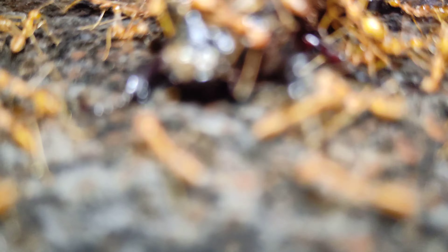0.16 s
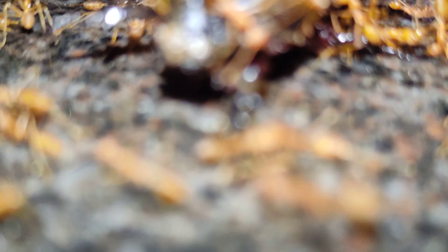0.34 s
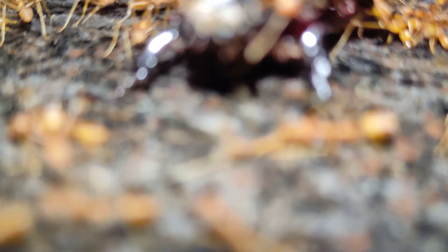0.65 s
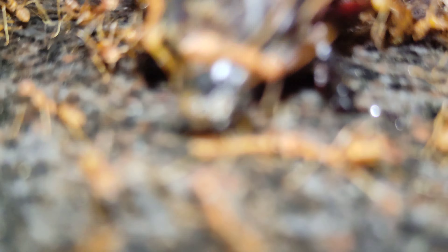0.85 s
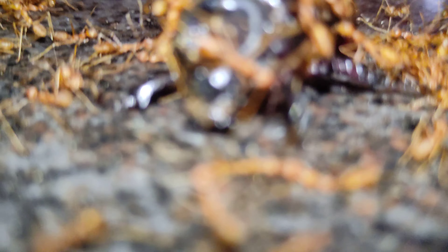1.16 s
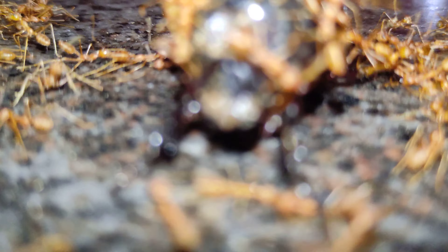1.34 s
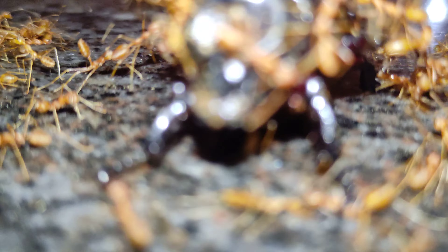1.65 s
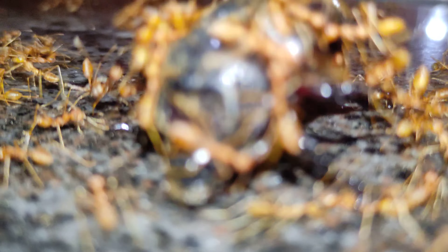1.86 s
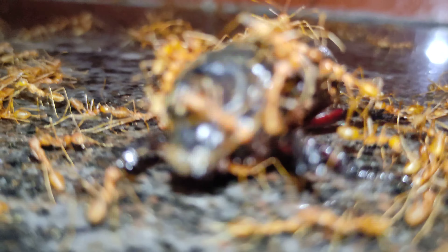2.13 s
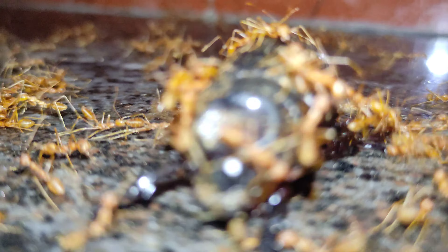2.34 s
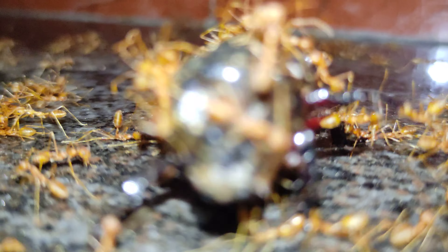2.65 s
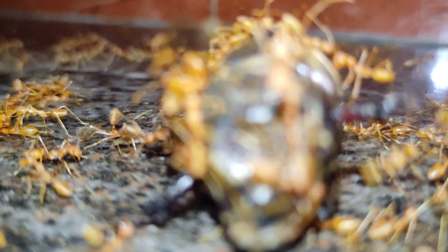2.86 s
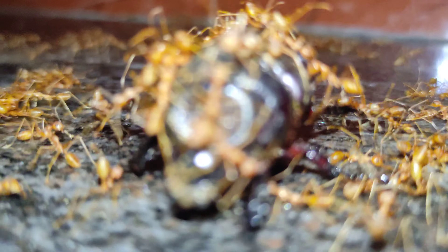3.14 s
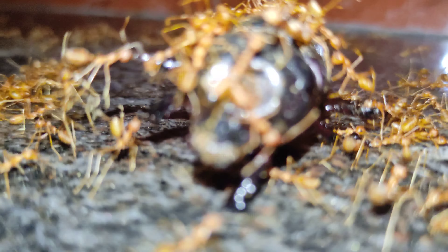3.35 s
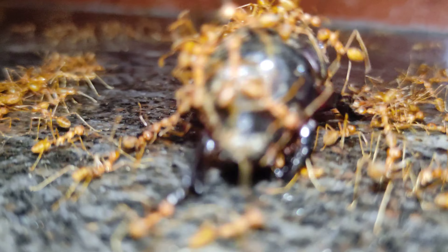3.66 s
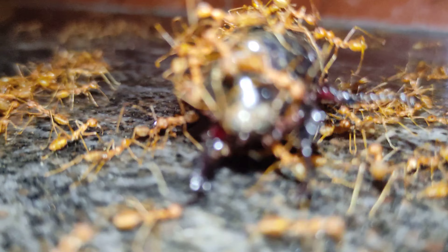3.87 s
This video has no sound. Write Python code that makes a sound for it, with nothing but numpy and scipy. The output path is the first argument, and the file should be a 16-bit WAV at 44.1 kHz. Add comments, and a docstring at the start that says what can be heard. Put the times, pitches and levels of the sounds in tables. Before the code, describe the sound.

Faint close ticks and light rubbing come first, then a quiet stretch, then harsh bright scratching with sharp snaps on the right, easing off at the end; crickets and high trills continue around outdoors.

```python
"""A low distant hum and a steady chorus of night insects are heard first, outdoors.
Two trillers, one far and one near, and crickets with an echo sing over them: pulsed resonances and tone bursts.
Something ticks and scrapes right at the right microphone port, loudest near the end: struck modes and
noise shaped by random slips. The scraping leaks faintly to the left port."""
import sys
import numpy as np
from scipy import signal
from scipy.fft import rfft, irfft
from scipy.io import wavfile
from scipy.ndimage import uniform_filter1d

SR = 44100
rng = np.random.default_rng(int(sys.argv[2]) if len(sys.argv) > 2 else 0)


def int16_out(signal):
    """Quantize to a 16-bit WAV file."""
    q = np.round(np.clip(np.atleast_2d(signal).T, -1, 1) * 32767)
    wavfile.write(sys.argv[1], SR, q.astype(np.int16))


def gain_from_db(level_db):
    """Convert decibel levels to linear amplitude factors (20 dB per decade)."""
    decades = np.asarray(level_db, float) / 20
    return 10 ** decades


N = 176400  # samples


def evened(x):
    """Normalization: scales a signal to rms 1."""
    return x / np.sqrt(np.mean(x ** 2) + 1e-20)


def read(points, hz):
    """Interpolation of a table along a logarithmic frequency axis."""
    f, value = np.transpose(points)
    return np.interp(np.log(hz + 1), np.log(f + 1), value)


def colour(x, points):
    """Linear filtering: multiplies the spectrum by a gain table in dB."""
    gain = gain_from_db(read(points, np.fft.rfftfreq(N, 1 / SR)))
    return irfft(rfft(x) * gain, N)


def resonate(x, hz, width):
    """Resonance: one damped pole applied three times about a centre hz, which may be a curve."""
    turn = np.exp(2j * np.pi * np.cumsum(hz * np.ones(N)) / SR)
    r = np.exp(-np.pi * width / SR)
    # shift the centre to 0 Hz, filter there, and shift back
    ringing = turn * signal.lfilter([1], np.poly([r, r, r]), x / turn)
    return evened(ringing.real)


def tail(t60, length):
    """Diffuse decay: two exponentially dying noise responses of energy 1."""
    t = np.arange(round(length * SR)) / SR
    h = rng.standard_normal((2, len(t))) * gain_from_db(-60 * t / t60)
    return h / np.linalg.norm(h, axis=1, keepdims=True)


# Relative spectral density of the background: f/Hz, level/dB
AIR_SPECTRUM = [(25, -45), (50, -34), (100, -5.5), (150, -3.5), (300, -6), (700, -14.5), (1200, -20.5),
                (2700, -28), (4500, -28), (5600, -32.5), (7500, -25), (9500, -26.5), (11000, -45.5),
                (14500, -34), (15300, -41), (15800, -86)]
# Correlation between the ports: f/Hz, left-right likeness (0 to 1)
AIR_LIKENESS = [(60, 0.91), (200, 0.66), (400, 0.72), (800, 0), (2000, 0)]
# Balance of the ports: f/Hz, left minus right level/dB
AIR_BALANCE = [(30, 9), (100, -2.5), (300, 1.5), (2000, 0), (7000, -7), (14000, 17)]


def air():
    """Partially coherent diffuse field: random spectra give distant hum and hiss in drifting patches."""
    frames, hz = N // 256 + 5, np.fft.rfftfreq(1024, 1 / SR)
    a, b, c, d, patches = rng.standard_normal((frames, 513, 5)).T
    patches = uniform_filter1d(patches, 10, 0)  # smooth along frequency
    patches = evened(uniform_filter1d(patches, 12, 1))  # and along time
    same = np.clip(read(AIR_LIKENESS, hz), -1, 1)[:, None]
    left = a + 1j * b
    right = same * left + np.sqrt(1 - same ** 2) * (c + 1j * d)
    side = read(AIR_BALANCE, hz)[:, None] / 2
    level_db = read(AIR_SPECTRUM, hz)[:, None] + 0.4 * patches
    z = np.array([left, right]) * gain_from_db(level_db + np.array([side, -side]))
    field = signal.istft(z, nperseg=1024, noverlap=768)[1][:, :N]
    return gain_from_db(-55) * evened(field)


# Steady insect bands: f/Hz, single-pass width/Hz, left level/dB, right level/dB (before the throb)
CHORUS_BANDS = [(6808, 590, -59.5, -58.5), (6300, 370, -78, -69), (4490, 760, -72, -76),
                (13320, 870, -85, -76.5), (11950, 220, -79.5, -79)]


def chorus():
    """Incoherent superposition: many far insects blur into narrow noise bands that throb a little."""
    out = np.zeros((2, N))
    for hz, width, left_db, right_db in CHORUS_BANDS:
        throb_db = 1.1 * evened(uniform_filter1d(rng.standard_normal(N), 1500))
        band = resonate(rng.standard_normal((2, N)), hz, width)
        out += band * gain_from_db(np.array([[left_db], [right_db]]) + throb_db)
    return out


# Trills: start t/s, length/s, right level/dB before the swell, singer (0 far, 1 near)
TRILL_EVENTS = [(0.04, 0.4, -58.5, 0), (0.562, 0.4, -45, 1), (1.303, 0.41, -57, 0), (1.572, .38, -44.5, 1),
                (2.08, 0.38, -58.5, 0), (2.579, .34, -44.5, 1), (3.557, 0.39, -46.5, 1)]
# Wing resonances, one list per singer: highest f/Hz, single-pass width/Hz, relative level/dB
WING_MODES = [
    [(8290, 93, -14), (8060, 920, -11.5)],
    [(8272, 280, 2), (8535, 180, -0.5), (7710, 230, -10)],
]
TRILL_PULSES_PER_S = 270  # on average
TRILL_RISE_S, TRILL_FALL_S = 0.12, 0.086  # onset length, e-folding time of the decay
TRILL_ARCH_HZ, TRILL_CLIMB_S = 219, 0.093  # initial pitch deficit, e-folding time of the climb


def trillers():
    """Forced resonance: uneven wing pulses ring modes; each trill climbs in pitch, holds, sags and dies away."""
    t, out, under_hz = np.arange(N) / SR, np.zeros((2, N)), np.zeros((2, N))
    uneven = 4.0 * uniform_filter1d(rng.standard_normal(N), 400)
    turns = np.cumsum(TRILL_PULSES_PER_S * (1 + uneven)) / SR
    pulses = 0.4 + np.exp(-(turns % 1) / 0.23)
    drive = pulses * rng.standard_normal((2, N))
    for start, length, _, singer in TRILL_EVENTS:
        u = t[t >= start] - start
        climb = np.exp(-u / TRILL_CLIMB_S)
        sag = 0.72 * np.minimum(u / length, 1.5) ** 3
        under_hz[round(singer), t >= start] = TRILL_ARCH_HZ * (climb + sag)
    voices = []
    for modes, under in zip(WING_MODES, under_hz):
        parts = [gain_from_db(db) * resonate(drive, hz - under, width) for hz, width, db in modes]
        voices.append(evened(sum(parts)))
    for start, length, level_db, singer in TRILL_EVENTS:
        rise = np.clip((t - start) / TRILL_RISE_S, 0, 1) ** 0.44
        fall = np.exp(-np.maximum(t - start - length, 0) / TRILL_FALL_S)
        swell_db = -4.0 * np.clip(2 * (t - start) / length - 1, -1, 1) ** 2
        out += gain_from_db(level_db + swell_db) * rise * fall * voices[round(singer)]
    return out * gain_from_db([[-8], [0]])  # the left port is weaker


# Chirp groups: start t/s, middle f/Hz, base level/dB, direct sound relative to the echo send/dB
CHIRP_GROUPS = [(.295, 3420, -62, -4), (.94, 3194, -63, -19), (1.458, 3418, -58.5, -7.5),
                (2.15, 3230, -64, -18), (2.588, 3434, -60.5, -4.5), (3.34, 3150, -65, -15),
                (3.83, 3440, -67.5, 5.5)]
# Successive chirps of a group: level relative to the base/dB
CHIRP_STEPS = [12, 11, -4]
CHIRP_S, CHIRP_GAP_S = 0.038, 0.087  # length, interval from start to start
CHIRP_SAG_HZ, CHIRP_BLUR_HZ = 30, 25.4  # fall over one chirp, rms pitch waver
YARD_T60_S, YARD_DB = 0.7, -6


def crickets():
    """Direct and reverberant field: groups of short sagging, unsteady tones with the yard's echo behind."""
    direct, sent, t = np.zeros(N), np.zeros(N), np.arange(N) / SR
    blur_hz = CHIRP_BLUR_HZ * evened(uniform_filter1d(rng.standard_normal(N), 300))
    waver = np.cumsum(blur_hz) / SR
    for start, hz, level_db, dry_db in CHIRP_GROUPS:
        for k, step_db in enumerate(CHIRP_STEPS):
            u = np.clip((t - start - k * CHIRP_GAP_S) / CHIRP_S, 0, 1)
            cycles = hz * t - CHIRP_SAG_HZ * CHIRP_S * (u ** 2 - u) / 2 + waver
            tone = gain_from_db(level_db + step_db) * np.sin(np.pi * u) * np.sin(2 * np.pi * cycles)
            direct += gain_from_db(dry_db) * tone
            sent += tone
    echo = signal.fftconvolve(sent[None], tail(YARD_T60_S, 1), axes=1)[:, :N]
    return direct * gain_from_db([[-1.5], [1.5]]) + gain_from_db(YARD_DB) * echo


CREEP_S, CREEP_DB = 0.001002, -77  # length and starting level of the rise before a blow


def ring(modes, chance):
    """Modal synthesis: one blow on modes, each a little different, after a short creep; peak 1."""
    t = np.arange(1500) / SR - CREEP_S
    x = np.zeros(len(t))
    for (hz, db, t60), a, b in zip(modes, chance[::2], chance[1::2]):
        envelope_db = np.where(t > 0, -60 * t / t60, -CREEP_DB * t / CREEP_S)
        mode_hz = hz * (1 + 0.16 * (b - 0.5))
        x += gain_from_db(db + 13.0 * (a - 0.5) + envelope_db) * np.sin(2 * np.pi * (mode_hz * t + a + b))
    return x / abs(x).max()


# Ticks: t/s, snap level/dB and knock level/dB before the gains, left minus right level/dB, knock f/Hz
TICK_EVENTS = [(0.599, -42, -55.5, -12, 506), (0.7507, -41, -51, -12, 382), (0.7619, -31, -36, -24, 406),
               (0.7673, -43, -42.5, -23, 404), (0.841, -46, -56, -6.5, 474), (0.9301, -39, -43, -8, 390),
               (0.9363, -24.5, -31.5, -6.5, 1510), (1.0337, -41, -49, 0.5, 406),
               (1.6414, -46, -71, -10, 643), (2.0301, -49, -56.5, -6, 579), (2.0462, -28, -52, -22, 423),
               (2.0719, -27.5, -55, -24, 425), (2.1176, -31, -59, -20, 382), (2.1226, -26.5, -70, -27, 382),
               (2.1734, -45, -58, -8, 450), (2.2104, -42, -55.5, -14, 450), (2.8546, -47, -61.5, -12, 540),
               (2.9309, -27, -71, -25, 390), (2.9612, -26, -65, -23, 1580), (3.0857, -21, -49, -32, 1210),
               (3.1198, -10.5, -33.5, -30, 1230), (3.1227, -7, -23, -25, 1260),
               (3.1367, -12, -43, -26, 1420), (3.1503, -5.5, -32, -42, 1110), (3.1593, -20, -50, -28, 1120),
               (3.1839, -9.5, -30, -31, 1150), (3.1917, -7.5, -30.5, -31, 1020),
               (3.1937, -10, -27, -26, 1320), (3.2244, -15, -43, -33, 1560), (3.3295, -9, -23, -34, 1380),
               (3.3324, -3.5, -26.5, -30, 1260), (3.3726, -17, -33.5, -34, 1280),
               (3.381, -18, -38, -37, 1570), (3.3978, -14, -39, -38, 1380),
               (3.4151, -13.5, -37.5, -32, 1420), (3.4421, -5, -24, -31, 1055),
               (3.7196, -48, -39.5, -15, 760), (3.8075, -18.5, -55, -24, 471)]
# Snap modes: nominal f/Hz, relative level/dB, t60/s
SNAP_MODES = [(3020, 0, 0.001), (4300, -6, 0.0057), (5400, 7.5, 0.0054), (6460, 11.5, 0.0024),
              (7900, 11, 0.0016), (9500, 7, .0025), (12040, 6, 0.0029), (14700, 0, 0.004)]
# Knock modes: ratio to the knock f, relative level/dB, t60/s
KNOCK_RATIOS = [(.35, -10.5, 0.014), (.6, -8, 0.0081), (1.0, 1.5, 0.0082), (1.5, -9.5, 0.0042),
                (2.4, -5.5, 0.0046)]
SNAP_GAIN_DB, KNOCK_GAIN_DB = 3.5, 12.5


def ticks():
    """Impulsive excitation: sharp snaps ring high modes, with a low knock of varying strength."""
    out = np.zeros((2, N + 1500))
    chances = rng.random((len(TICK_EVENTS), 16))
    for (s, snap_db, knock_db, left_db, knock_hz), chance in zip(TICK_EVENTS, chances):
        at = round(s * SR)
        knock_modes = [(ratio * knock_hz, db, t60) for ratio, db, t60 in KNOCK_RATIOS]
        snap = gain_from_db(SNAP_GAIN_DB + snap_db) * ring(SNAP_MODES, chance)
        knock = gain_from_db(KNOCK_GAIN_DB + knock_db) * ring(knock_modes, chance)
        out[:, at:at + 1500] += gain_from_db([[left_db], [0]]) * (snap + knock)
    return out[:, :N]


# Strokes, one list each: t/s, level/dB, low part relative/dB, treble part relative/dB (before part gains)
STROKES = [
    [(0.835, -67.5, 8, -10), (0.855, -57.5, 7, -5.8), (0.89, -56.5, 2.5, -9.5), (0.925, -54.5, 4, -3),
     (0.95, -55, 9, 2), (0.965, -69.5, 8, -14), (0.99, -56, 3.5, -6), (1.03, -55, 8.5, -9),
     (1.045, -61.5, 10, -4), (1.06, -66, 2, -3.8)],
    [(1.29, -73, 8, -5), (1.31, -58, -0.5, -12), (1.33, -61, -4, -14), (1.345, -64.5, 10, -16),
     (1.36, -64, 9, -15), (1.385, -66.2, 5.5, -10), (1.4, -74, 3.2, 1.7)],
    [(2.02, -78, -1, -4.7), (2.06, -79, 7, -11), (2.14, -71.5, 9, -8), (2.2, -68, 3, 1),
     (2.25, -75.5, 12, -12), (2.3, -73, 7, -12), (2.33, -86, 8, 1.0)],
    [(2.86, -74, 2.6, -14.0), (2.885, -48, -2.5, -14), (2.92, -43.5, -11, -10.5), (2.95, -42.5, -8, -15),
     (2.98, -42.5, -8, -12), (3.02, -43.0, -5, -11), (3.05, -37.5, -6.5, -7.9), (3.08, -34.5, -12, -7),
     (3.115, -30, -13, -6.5), (3.13, -46, -11, 0), (3.145, -36.5, -1, -11), (3.17, -40, -10, -4),
     (3.18, -37, -3, 1), (3.205, -35, -13.5, -3.5), (3.23, -33, -4.1, -3.1), (3.26, -30.5, -13.5, -7.5),
     (3.29, -27.5, -6, 1), (3.32, -26.5, -13, -8), (3.342, -36.5, 0.5, -4.0), (3.37, -32, -11.5, -3.5),
     (3.41, -34.5, -12, -0.6), (3.43, -40.5, -7, 6), (3.452, -47, 2.5, -13), (3.475, -49, -1.2, 5.5),
     (3.495, -57.5, 0.5, -3), (3.54, -55.5, 4.5, -2.5), (3.57, -45.5, -5.5, -7), (3.62, -52, -6, -5),
     (3.68, -50, -6.5, -8), (3.74, -57, 2, -5), (3.78, -50, -4.5, -11), (3.82, -61, 5, -2),
     (3.85, -49, 0.5, -6), (3.92, -50.5, -4, -2.5), (3.97, -49, -7, -3.5), (4.0, -55.5, 2.7, -6)],
]
# Colours of the rubbing, pressed hard or lightly: f/Hz, relative level/dB
BODY_HARD = [(1800, -18.5), (2800, -10), (3500, 0), (4500, 2.5), (5400, 7.5), (6600, 3), (7400, -2),
             (8600, -6), (9500, -50)]
BODY_LIGHT = [(1800, -24), (2700, -13), (3300, 2), (4200, 1), (4900, 0), (6600, -0.5), (7400, -5.5),
              (8600, -15.5), (9500, -36)]
LOW_HARD = [(150, -17), (600, -15.5), (1000, -4.5), (1350, 4.5), (1750, -6), (2300, -2.5), (3000, -10.5),
            (4000, -24)]
LOW_LIGHT = [(150, -15), (600, -5), (1200, -0.5), (1600, 1), (2600, -2.5), (3500, -9.5), (4500, -20.5)]
TREBLE = [(7500, -13.5), (8800, 3.5), (10300, 3), (11200, -2), (11900, 7.5), (13500, 0), (15200, 6),
          (15700, -43), (16300, -52)]
LIGHT_DB, HARD_DB = -43, -29.5  # stroke levels between which the colour turns from light to hard
GRAINS_PER_S, GRAIN_T60_S = 3000, 0.0022


def scraping():
    """Stick-slip friction: dense random slips in clumps, plus hiss; harder pressure changes the colour."""
    t, out = np.arange(N) / SR, np.zeros(N)
    slips = (rng.random(N) < GRAINS_PER_S / SR).astype(float)
    # the power of each slip decays; the root gives the amplitude envelope
    grains = np.sqrt(signal.lfilter([1], [1, -gain_from_db(-120 / GRAIN_T60_S / SR)], slips))
    clumps = gain_from_db(1.4 * evened(uniform_filter1d(rng.standard_normal(N), 300)))
    drive = clumps * (evened(grains) + 1) * rng.standard_normal(N)  # the 1 is steady hiss
    tables = (BODY_HARD, BODY_LIGHT, LOW_HARD, LOW_LIGHT, TREBLE)
    body_hard, body_light, low_hard, low_light, treble = (evened(colour(drive, part)) for part in tables)
    for stroke in STROKES:
        s, level_db, low_db, treble_db = np.transpose(stroke)
        # silent outside the stroke
        level, low_level, treble_level = (gain_from_db(np.interp(t, s, db, -200, -200))
                                          for db in (level_db, low_db, treble_db))
        hard = np.clip((np.interp(t, s, level_db) - LIGHT_DB) / (HARD_DB - LIGHT_DB), 0, 1)
        body = hard * body_hard + (1 - hard) * body_light
        low = hard * low_hard + (1 - hard) * low_light
        out += level * (gain_from_db(5.0) * body + gain_from_db(0.5) * low_level * low + gain_from_db(2.0) * treble_level * treble)
    return out


# Transmission from the right port to the left: f/Hz, level/dB
LEAK_GAIN = [(60, -10), (300, -14), (700, -20), (1500, -26), (3000, -27), (4200, -29), (5000, -40),
             (8600, -42), (9600, -17), (10600, -17), (11400, -28), (13500, -24), (15000, -30)]


def leak(rub):
    """Transmission loss: the left port receives the scraping filtered and smeared by a short decay."""
    return signal.fftconvolve(colour(rub, LEAK_GAIN), tail(0.014, 0.03)[0])[:N]


def scene():
    """Linear superposition: far insects in both ports, close contact mostly in the right one."""
    rub = scraping()
    contact = np.array([leak(rub), rub])
    return air() + chorus() + trillers() + crickets() + ticks() + contact


def band_limit(x):
    """A steep low-pass at the top of the band."""
    return signal.sosfilt(signal.butter(12, 16620, fs=SR, output="sos"), x)


def record(dry):
    """High-pass response and overload: the microphone cuts the lows below 70 Hz and clips at 0.85."""
    low_cut = signal.butter(2, 70, "high", fs=SR, output="sos")
    mix = np.clip(signal.sosfilt(low_cut, dry), -0.85, 0.85)
    return band_limit(mix)


dry = scene()
out = record(dry)
int16_out(out)
```